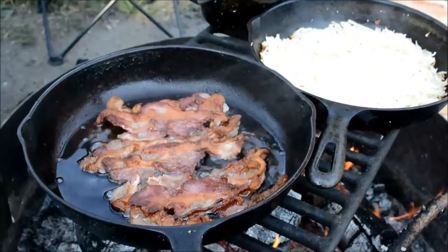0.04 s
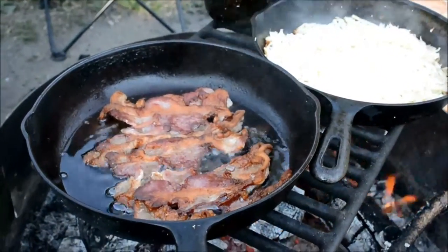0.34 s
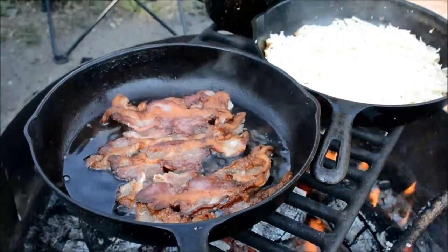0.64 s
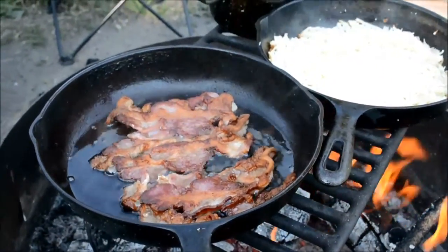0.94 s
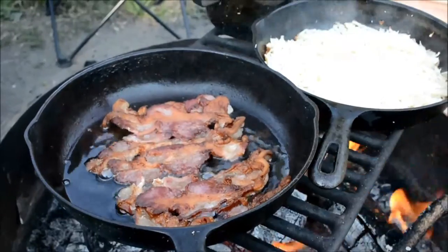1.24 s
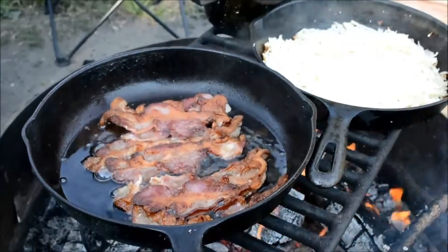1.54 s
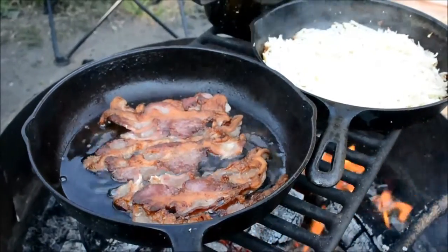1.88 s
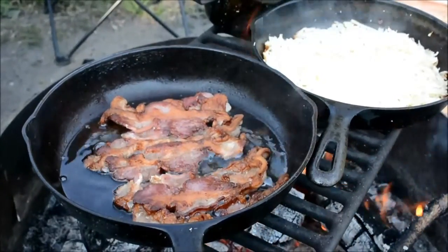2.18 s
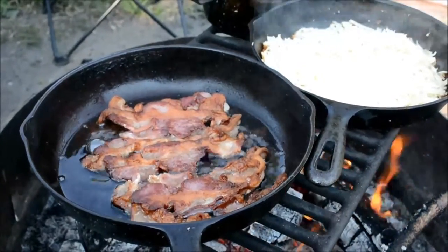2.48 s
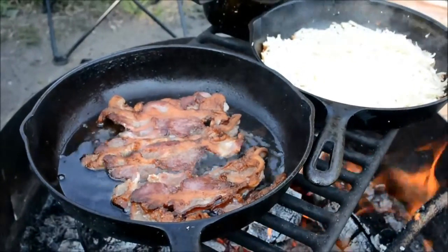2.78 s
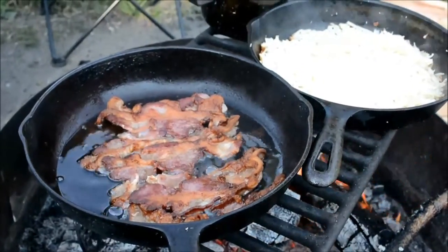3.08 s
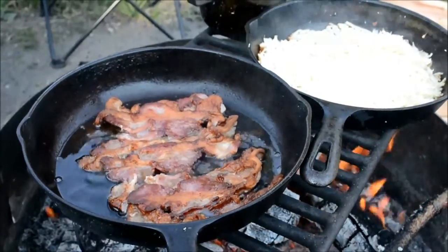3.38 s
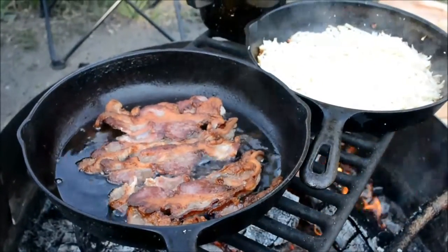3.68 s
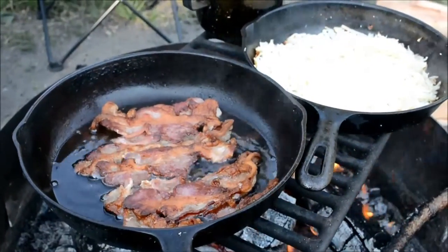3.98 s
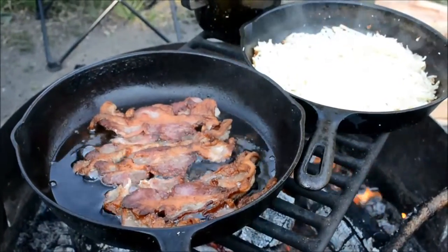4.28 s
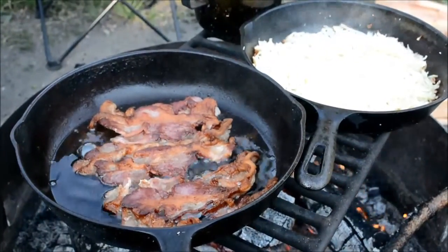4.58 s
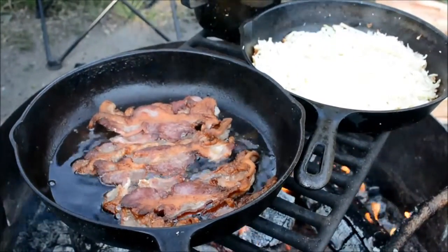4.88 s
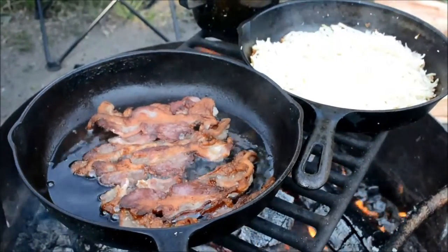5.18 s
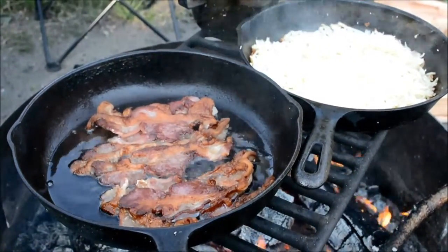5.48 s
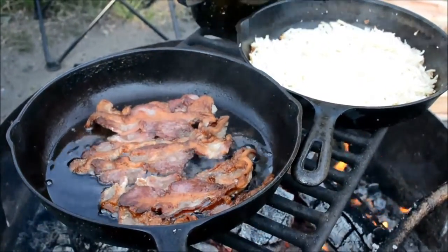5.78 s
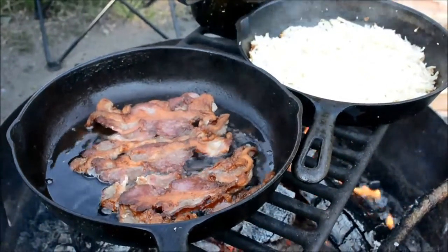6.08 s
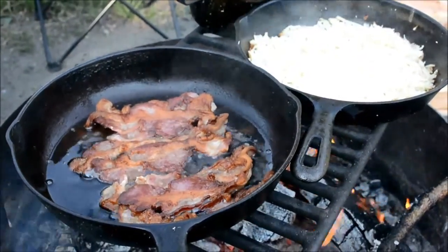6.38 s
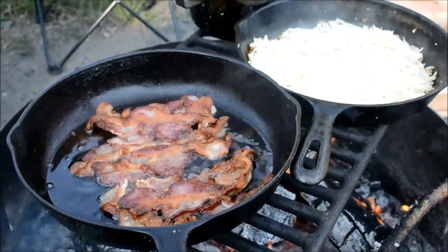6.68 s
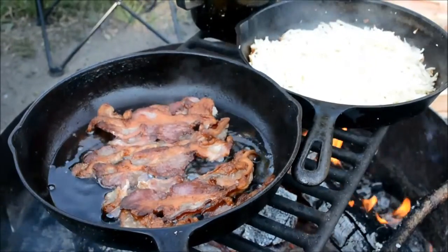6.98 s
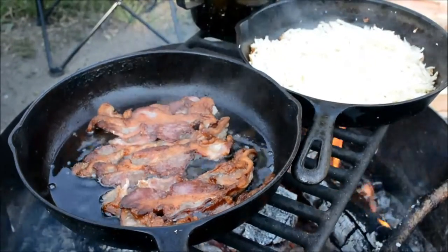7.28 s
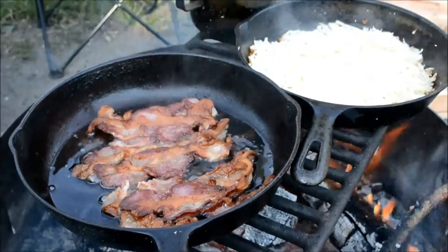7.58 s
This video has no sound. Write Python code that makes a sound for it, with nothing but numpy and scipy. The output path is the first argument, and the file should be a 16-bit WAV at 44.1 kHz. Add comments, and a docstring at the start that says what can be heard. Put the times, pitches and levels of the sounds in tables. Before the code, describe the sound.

Close to a pan on an outdoor wood fire, bacon grease fizzes brightly and pops at irregular moments. The flames make a soft rushing noise underneath, and the burning wood gives a few faint knocks early on. Crackles continue throughout, each leaving a very slight ring in the iron. Later one loud spit bursts from the pan with a brief spray, and the frying grows quieter toward the end.

```python
"""Outdoors at a campfire, bacon fries in a cast-iron skillet, heard from close by.
Countless small steam bubbles burst in the grease over the soft rush of the fire; larger ones plip
or squeak. Fat and embers snap, the wood knocks, and a trapped drop of water makes the pan spit hard
once. The iron rings faintly with each burst. Sizzle and fire fade toward the end."""
import sys
import numpy as np
from scipy import signal
from scipy.io import wavfile

SR = 44100
rng = np.random.default_rng(int(sys.argv[2]) if len(sys.argv) > 2 else 0)


def store_pcm(level_fs):
    """Save levels as 16-bit WAV."""
    pcm = np.round(np.clip(level_fs, -1, 1) * 32767).astype(np.int16)
    wavfile.write(sys.argv[1], SR, np.atleast_2d(pcm).T)


N = 337365
TIME_S = np.arange(N) / SR

# Sizzle bubble size by pitch: pitch_hz, level_db
SIZZLE_SPECTRUM = [(900, -7.5), (1400, -1.5), (2200, 1), (3100, -1), (4350, 1), (5700, -4.5), (7400, 0.5),
                   (9500, -4), (11500, -13)]
def sizzle(level_db=-39.9):
    """Water boils out of the bacon in a steady fizz."""
    pitches_hz = np.geomspace(1000, 11000, 96)
    sizes_db = spectrum_at(SIZZLE_SPECTRUM, pitches_hz)
    fizz = swarm(pitches_hz, sizes_db, per_s=9000, spread_db=4.5, cycles=1.28, clump_db=2.8, cap=3.7)
    return gain(level_db) * fizz


def swarm(pitches_hz, sizes_db, per_s, spread_db, cycles, clump_db, cap, site_count=8000):
    """Tiny bubbles burst in random clumps, up to cap * spread_db above their base size; unit rms."""
    burst_chance = gain(clump_db * drift(45)) * per_s * N / SR / len(pitches_hz) / site_count
    indices, left, right = [], [], []
    for hz, db in zip(pitches_hz, sizes_db):
        sites = rng.random((site_count, 5))
        bursts = sites[:, 1] < burst_chance[(sites[:, 0] * N).astype(int)]
        when, _, size, pan, sign = sites[bursts].T
        height = gain(db + spread_db * np.minimum(-np.log(1 - size), cap)) * np.sign(sign - .5)
        grain = cavity(hz, cycles * 2 ** rng.uniform(-0.41, 0.71) / hz)
        grain = grain / np.linalg.norm(grain)
        lean = (0.29 + hz / 22000) * (pan - .5)  # treble spreads wider
        indices.append(((when * N).astype(int)[:, None] + np.arange(len(grain))).ravel())
        left.append(np.outer(height * (1 + lean), grain).ravel())
        right.append(np.outer(height * (1 - lean), grain).ravel())
    channels = [np.bincount(np.concatenate(indices), np.concatenate(side), N) for side in (left, right)]
    return unit_rms(np.array(channels)[:, :N])


def cavity(hz, ring_s, end_hz=None, glide_s=1):
    """A bubble cavity rings up quickly and dies away; its pitch may slide as it opens."""
    t = np.arange(int(9 * ring_s * SR) + 8) / SR
    pitch_hz = np.full_like(t, hz) if end_hz is None else end_hz + (hz - end_hz) * np.exp(-t / glide_s)
    envelope = (t / ring_s * np.exp(1 - t / ring_s)) ** .75
    return envelope * np.sin(2 * np.pi * np.cumsum(pitch_hz) / SR)


# Large bubbles in the grease: start_s, level_db, pitch_hz, ring_cycles
LARGE_BUBBLES = [(0.012, -19.5, 1760, 0.75), (0.048, -21, 1300, 0.42), (.0485, -19, 3700, .5),
                 (.1455, -20, 8200, .9), (.148, -24, 3400, .8), (0.1532, -22, 1600, 1.1),
                 (.165, -22, 1800, .8), (.1747, -18, 2400, .3), (0.177, -17, 1920, 0.33),
                 (.237, -26, 7300, 1.4), (0.268, -23, 3480, 1.5), (.2675, -25, 5140, 1.6),
                 (.3765, -16, 6900, 1.3), (0.379, -18.5, 1420, 0.7), (0.42, -21, 2540, 0.51),
                 (.421, -19, 6430, 1), (0.528, -17, 3300, 0.51), (0.58, -19, 7150, 2.4),
                 (.587, -22, 3470, 0.79), (.637, -23, 7540, 1.6), (.6444, -24, 1550, 0.62),
                 (0.652, -25, 4130, 2.1), (.678, -24, 3810, .9), (.7807, -25, 2850, 1.1),
                 (0.797, -11.5, 2700, 0.29), (.7987, -24, 3330, 1.1), (0.802, -16, 7560, 0.62),
                 (0.8488, -17.5, 2900, 0.6), (0.894, -22, 7780, 1.3), (0.954, -20.5, 1790, 0.6),
                 (1.004, -26, 4230, 0.82), (1.024, -25, 1400, 1), (1.161, -27, 3090, 1.7),
                 (1.2285, -14.5, 3850, 1.2), (1.287, -18, 7500, .72), (1.3, -19, 2390, 0.71),
                 (1.359, -23, 6050, 1.3), (1.403, -13, 3420, 0.56), (1.457, -23, 6740, 1.5),
                 (1.48, -24, 1560, 0.63), (1.4864, -24, 1490, 0.61), (1.539, -23, 5800, 1.1),
                 (1.5445, -13.5, 2100, 0.36), (1.593, -17, 4320, 0.31), (1.6215, -18, 3100, 0.29),
                 (1.6274, -23, 1670, 0.64), (1.789, -26, 3550, 1.2), (1.7995, -25, 7300, 1.7),
                 (1.814, -25, 3900, 1.2), (1.864, -24, 7230, 1.9), (1.893, -21.5, 4230, 2.7),
                 (1.9163, -21, 1750, 0.6), (1.986, -24, 4260, 1.5), (2.018, -13.5, 5560, 0.32),
                 (2.026, -19, 4490, 1.3), (2.037, -25, 6930, 1.6), (2.123, -12, 2200, 0.51),
                 (2.242, -23, 8040, 0.9), (2.377, -14, 1500, 0.31), (2.476, -23, 7630, 1.2),
                 (2.48, -22.5, 4090, 0.91), (2.615, -21, 5260, 1.2), (2.63, -19, 1450, 0.45),
                 (2.748, -18, 3460, .48), (2.814, -12, 2400, 0.24), (2.7706, -24, 4260, 1),
                 (2.8197, -23, 4040, 1), (2.858, -21, 7350, .97), (2.888, -22, 4570, 1.3),
                 (2.897, -19.5, 4710, 1.3), (2.974, -20, 3730, 1), (2.982, -16, 2700, .75),
                 (3.023, -24, 4230, 1.1), (3.036, -25, 4030, 1), (3.117, -23.5, 4140, 0.9),
                 (3.131, -27, 1630, 1.5), (3.237, -18, 2090, 0.38), (3.2385, -24, 3200, 1.1),
                 (3.342, -21.5, 4450, 1.8), (3.3645, -19, 4020, 2.2), (3.5536, -24, 2510, .6),
                 (3.5658, -24, 4220, 1), (3.671, -18.5, 1870, 1), (3.674, -26, 6900, 1.6),
                 (3.71, -21.5, 3480, 0.74), (3.808, -14, 5260, 0.27), (3.8977, -21, 8200, 1.2),
                 (3.945, -19, 3380, 0.61), (3.988, -15.5, 3100, 0.49), (4.063, -24, 7000, .8),
                 (4.071, -20, 3880, .5), (4.104, -19, 3180, 0.74), (4.112, -10.5, 2480, 0.26),
                 (4.1286, -24, 2510, .7), (4.141, -25, 3670, 0.97), (4.163, -25, 1370, 1.6),
                 (4.171, -19, 7060, 1.6), (4.187, -18.5, 2400, 0.26), (4.217, -28, 1420, 1.4),
                 (4.308, -24, 3570, 3), (4.335, -21, 1750, 0.43), (4.3353, -17.5, 4100, 0.75),
                 (4.3682, -22, 3500, .55), (4.449, -20.5, 1320, 0.87), (4.4725, -25, 4360, 1),
                 (4.586, -26, 3980, 1.3), (4.597, -21, 2060, 0.76), (4.737, -22, 4830, 1.2),
                 (4.775, -16.5, 1700, .36), (4.934, -17, 8400, 1.7), (4.985, -17, 4950, .73),
                 (4.9936, -22, 2460, .8), (5.0067, -21, 7970, .7), (5.017, -14.5, 4450, 1.25),
                 (5.035, -25, 3960, 1), (5.0375, -21, 2100, .5), (5.123, -13.5, 2300, 0.17),
                 (5.157, -22, 3070, 0.91), (5.165, -24, 7700, 1.5), (5.233, -15.5, 2440, 0.24),
                 (5.2865, -22, 2570, .7), (5.326, -20, 3560, .67), (5.367, -20, 4030, 2),
                 (5.4, -24, 2610, .6), (5.4265, -28, 7520, 1.3), (5.614, -13, 3280, 0.52),
                 (5.663, -24, 4060, 1), (5.7273, -19.5, 1890, 0.43), (5.8995, -26, 7060, 1.3),
                 (5.922, -17, 3600, .4), (6.0225, -26, 4280, 1), (6.1176, -25, 7490, 1.3),
                 (6.217, -20.5, 3950, 0.62), (6.262, -23, 7430, 1.2), (6.324, -13, 2280, 0.2),
                 (6.396, -20, 1720, 0.25), (6.428, -25.5, 2250, 1.4), (6.4295, -29, 2850, 1.6),
                 (6.438, -30, 1370, 1), (6.519, -17, 3090, 0.29), (6.5428, -27, 4430, 1),
                 (6.5767, -23.5, 4410, 1.2), (6.604, -25, 8600, 1.1), (6.6575, -33, 2570, 0.6),
                 (6.6747, -28, 7400, 1.2), (6.725, -24, 7400, 1.4), (6.787, -21, 7600, 0.95),
                 (6.855, -27, 6950, 2.4), (7.034, -24.5, 4300, 1.3), (7.0623, -28, 2200, .5),
                 (7.272, -23.5, 2600, 0.71), (7.348, -29, 7000, 1), (7.514, -30, 7700, 1.9),
                 (7.5206, -37, 7850, 1.6), (7.528, -29.5, 7660, 1.5), (7.54, -28.5, 7150, 1.4),
                 (7.5683, -32, 2750, .6)]
def plips(table, trim_db=0, highpass_hz=607, film_db=-11, film_cycles=0.29, echo_db=-13, echo_s=.0016):
    """The film clicks, the cavity rings; the delay of the pan-wall echo depends on position."""
    out = np.zeros((2, N))
    for (start_s, db, hz, cycles), (side, position) in zip(table, rng.standard_normal((len(table), 2))):
        pan = 0.05 * side
        film = gain(db + trim_db + film_db) * min(cycles, 1) * cavity(hz, film_cycles / hz)
        burst = gain(db + trim_db) * cavity(hz, cycles / hz)
        place(out, start_s, film, pan)
        place(out, start_s, burst, pan)
        place(out, start_s + echo_s * (1 + np.tanh(position) / 2), gain(echo_db) * burst, -pan)
    out = butter(out, highpass_hz, "high")
    return butter(out, 9800, "low", order=6)  # grease rounds off the onset


# Mid-size bubble classes: rate_per_s, level_db, pitch_hz, ring_cycles
BUBBLE_CLASSES = [(5, -29.5, 1450, .9), (7, -29, 2550, .8), (10, -29, 4150, 1.15), (14, -31, 5700, 1.2),
                  (16, -28, 7800, 1.4)]
def stray_bubbles(spread_db=2.0, spread_octaves=0.13, ring_spread=0.29):
    """Rows for plips: bubbles burst at random; the longer one rings, the lower its peak."""
    rows = []
    for per_s, db, hz, cycles in BUBBLE_CLASSES:
        for start_s, (size, pitch, ring) in zip(random_times(per_s), rng.standard_normal((400, 3))):
            stretch = np.exp(ring_spread * ring)
            level_db = db + spread_db * size - 10 * np.log10(stretch)
            rows.append((start_s, level_db, hz * 2 ** (spread_octaves * pitch), cycles * stretch))
    return rows


# Runs of small pops: start_s, length_s, level_db, pitch_hz
POP_FLURRIES = [(0.024, .05, -27, 6300), (1.525, .16, -28.5, 6400), (1.766, .115, -28, 4730),
                (3.686, .11, -29, 5750)]
def flurries(per_s=140, spread_db=1.5, spread_octaves=0.3, cycles=1.07):
    """Rows for plips: water runs into hot fat and pops in quick succession."""
    rows = []
    for start_s, length_s, db, hz in POP_FLURRIES:
        for delay_s, (size, pitch) in zip(random_times(per_s), rng.standard_normal((400, 2))):
            if delay_s < length_s:
                pitch_hz = hz * 2 ** (spread_octaves * pitch)
                rows.append((start_s + delay_s, db + spread_db * size, pitch_hz, cycles))
    return rows


# Cracks of the hard spit: peak_s, level_db
SPIT_CRACKS = [(5.4415, -7), (5.4464, -2.5), (5.447, -3.5), (5.4475, -7), (5.4483, -5), (5.4491, -2.5),
               (5.4504, -10)]
def hard_spit(needle_s=.000034, suction_s=0.00013, lowpass_hz=11000):
    """A trapped water drop bursts in a volley of pressure needles, each flanked by shallow suction."""
    out, t = np.zeros((2, N)), np.arange(-32, 33) / SR
    needle, suction = np.exp(-(t / needle_s) ** 2), np.exp(-(t / suction_s) ** 2)
    pulse = butter(needle / needle.sum() - suction / suction.sum(), lowpass_hz, "low", order=8)
    for peak_s, db in SPIT_CRACKS:
        place(out, peak_s + t[0], gain(db) * pulse / pulse.max(), rng.uniform(-.1, .1))
    return out


# Loud snaps: start_s, level_db, lowpass_hz
LOUD_SNAPS = [(0.4514, -25, 13000), (.8492, -17, 4000), (1.0121, -20, 9000), (1.1125, -17.5, 11300),
              (1.745, -18, 7000), (1.84, -14, 10500), (2.1228, -21, 5000), (2.3828, -21, 7000),
              (2.8142, -23, 11000), (3.0977, -17, 12000), (3.6005, -22, 10000), (4.1118, -24, 15000),
              (4.3743, -24, 13000), (5.123, -15.5, 9000), (5.4305, -20, 9000), (5.466, -15, 5000),
              (5.469, -23, 8000), (5.4743, -25, 9000), (5.8436, -19.5, 9000), (5.917, -20, 10000),
              (5.9402, -21, 6000), (6.3198, -25, 9000), (6.5764, -19, 11500), (6.5781, -23, 7000),
              (6.5815, -21, 15000), (6.7158, -22, 9000), (6.9995, -27, 11000), (7.0933, -20, 13500),
              (7.1148, -28, 11000), (7.5677, -27.5, 11000), (7.6243, -27, 12900)]
def snaps(table, trim_db=1, splinter=0.27, decay_s=0.0013, highpass_hz=1400):
    """Fat or an ember snaps: one steep crack, then a millisecond of splintering."""
    out, t = np.zeros((2, N)), np.arange(SR // 100) / SR
    for start_s, db, lowpass_hz in table:
        crack = (t == 0) + splinter * rng.standard_normal(len(t)) * np.exp(-t / decay_s)
        crack = butter(butter(crack, lowpass_hz, "low", order=1), highpass_hz, "high")
        top_octave = 0.4 * (lowpass_hz / 13000) ** 3 * np.diff(crack, prepend=0)
        snap = butter(crack, 10400, "low", order=8) + butter(top_octave, 14800, "low", order=4)
        place(out, start_s, gain(db + trim_db) * snap / abs(snap).max(), rng.uniform(-0.14, 0.15))
    return out


def stray_snaps(per_s=3, level_db=-28, lowpass_hz=11000, spread_db=1.5, spread_octaves=0.18):
    """Rows for snaps: faint ones at random times."""
    return [(start_s, level_db + spread_db * size, lowpass_hz * 2 ** (spread_octaves * edge))
            for start_s, (size, edge) in zip(random_times(per_s), rng.standard_normal((200, 2)))]


# Steam escaping under the bacon: start_s, level_db, start_hz, end_hz, glide_s, ring_s
STEAM_SQUEAKS = [(.069, -26, 12200, 9900, 0.00163, 0.0016), (1.821, -17.5, 4780, 3900, 0.0047, 0.0013),
                 (1.8235, -27, 3900, 2860, .005, .0016), (5.8432, -14.5, 3250, 2150, 0.001, 0.00041),
                 (5.846, -23, 2370, 1990, 0.0087, 0.0043)]
def squeaks():
    """A steam pocket widens as it vents, so its note falls."""
    out = np.zeros((2, N))
    for start_s, db, start_hz, end_hz, glide_s, ring_s in STEAM_SQUEAKS:
        place(out, start_s, gain(db) * cavity(start_hz, ring_s, end_hz, glide_s), pan=0)
    return out


# Boiling surges: crest_s, level_db
BOIL_SURGES = [(.015, -30), (.055, -33), (.115, -32), (.163, -28), (0.246, -29.5), (0.374, -29.5),
               (.432, -32)]
def boil(rise_s=0.032, fall_s=0.04, centre_hz=1700, rolloff_db=-5.8):
    """Grease boils up in surges of lower bubbles, so crowded that they merge into a rush."""
    pitches_hz = np.geomspace(640, 7500, 30)
    sizes_db = rolloff_db * np.log2(pitches_hz / centre_hz) ** 2
    surges = [gain(db) * swell(crest_s, rise_s, 0, fall_s) for crest_s, db in BOIL_SURGES]
    bubbles = swarm(pitches_hz, sizes_db, per_s=2400, spread_db=2.7, cycles=1.1, clump_db=2, cap=2.9)
    return np.linalg.norm(surges, axis=0) * bubbles


# Grease jets: start_s, level_db, length_s
GREASE_JETS = [(5.4395, -26, .003), (5.4462, -17.5, 0.003), (5.458, -34, 0.011), (5.848, -34, 0.016)]
def spray(rise_s=0.00044, fall_s=0.0034, db_per_octave=1.5):
    """Dense jets of droplets fly out of the pan."""
    pitches_hz = np.geomspace(1100, 11000, 20)
    sizes_db = db_per_octave * np.log2(pitches_hz / 4000)
    drops = swarm(pitches_hz, sizes_db, per_s=12000, spread_db=1, cycles=1.5, clump_db=0, cap=3)
    return drops * sum(gain(db) * swell(start_s, rise_s, length_s, fall_s)
                       for start_s, db, length_s in GREASE_JETS)


# Droplet landings: start_s, level_db
MIST_LANDINGS = [(1.545, -47), (1.62, -46), (5.445, -35), (5.914, -41)]
def mist(rise_s=0.00044, fall_s=0.059, db_per_octave=7.0):
    """Droplets thrown by a spit land on hot iron and fizz briefly."""
    pitches_hz = np.geomspace(4000, 11000, 8)
    sizes_db = db_per_octave * np.log2(pitches_hz / 4000)
    drops = swarm(pitches_hz, sizes_db, per_s=3300, spread_db=4, cycles=1.1, clump_db=4.5, cap=3.4)
    return drops * sum(gain(db) * swell(start_s, rise_s, 0, fall_s) for start_s, db in MIST_LANDINGS)


# Skillet modes: pitch_hz, gain_db, t60_s
IRON_MODES = [(1353, -10, 0.074), (4310, -2, 0.17), (4560, -6, 0.22)]
def skillet(bursts):
    """Every burst makes the pan ring a little; the grease damps it."""
    t = np.arange(SR // 3) / SR
    modes = np.zeros_like(t)
    for hz, db, t60_s in IRON_MODES:
        decay = gain(-60 * t / t60_s)
        modes += gain(db) * 2 * decay / decay.sum() * np.sin(2 * np.pi * hz * t)
    return bursts + signal.oaconvolve(bursts, modes[None], axes=1)[:, :N]


# Rush spectrum: frequency_hz, density_db
RUSH_SPECTRUM = [(25, -55), (60, -30.5), (130, -13), (245, -2), (320, -8.5), (420, -11), (520, -2),
                 (1000, -1.5), (1350, .8), (2100, -5.5), (3200, -12.5), (4400, -12), (5900, -18),
                 (8000, -14.5), (11000, -17.5), (13000, -25.5), (16000, -41)]
# Rush stereo width: frequency_hz, side_to_mid_db
RUSH_WIDTH = [(70, -31), (300, -20), (700, -18), (1400, -30), (4000, -18), (9000, -9), (13000, -27)]
def fire_rush(level_db=-38.0, patch_db=0.9):
    """Flames and the blur of far bubbles: soft noise with drifting patches."""
    hz = np.fft.rfftfreq(1024, 1 / SR)
    mid_re, mid_im, side_re, side_im, patches = rng.standard_normal((5, N // 256 + 5, len(hz)))
    patches = unit_rms(signal.fftconvolve(patches, np.ones((8, 14)), "same"))
    mid = mid_re + 1j * mid_im
    side = gain(spectrum_at(RUSH_WIDTH, hz)) * (side_re + 1j * side_im)
    colour = gain(spectrum_at(RUSH_SPECTRUM, hz) + patch_db * patches)
    frames = np.array([mid + side, mid - side]) * colour
    _, noise = signal.istft(frames.swapaxes(1, 2), nperseg=1024, noverlap=768)
    return gain(level_db) * unit_rms(noise[:, :N])


# Wood knocks: start_s, level_db, pitch_hz, ring_cycles
WOOD_KNOCKS = [(.848, -36, 352, 0.85), (.925, -41, 256, 1.3), (1.808, -25, 844, 0.56),
               (1.838, -28, 342, 0.38)]
def wood_knocks():
    """Burning wood knocks: a click and a short ring, like a low plip."""
    return plips(WOOD_KNOCKS, trim_db=-2.0, highpass_hz=100)


def reflections(frying, wall_db=-18, wall_decay_s=0.0096, tail_db=-21, tail_decay_s=0.011):
    """The skillet wall echoes at once; grate and fire ring add a faint, short tail."""
    t = np.arange(SR // 8) / SR
    wall = rng.standard_normal(len(t)) * np.exp(-t / wall_decay_s) * (t > .0006)
    tail = rng.standard_normal((2, len(t))) * np.exp(-t / tail_decay_s) * (t > .003)
    echo = gain(wall_db) * wall / np.linalg.norm(wall) + gain(tail_db) * tail / np.linalg.norm(tail[0])
    return frying + signal.oaconvolve(frying, echo, axes=1)[:, :N]


def hiss(level_db=-68, highpass_hz=6000):
    """A faint steady hiss remains as the frying fades."""
    return gain(level_db) * butter(rng.standard_normal(N), highpass_hz, "high")


def fade(trim_db=1, start_s=5.503, length_s=2.58):
    """Steady gain, then a linear fall."""
    return gain(trim_db) * np.clip(1 - (TIME_S - start_s) / length_s, 0, 1)


def swell(crest_s, rise_s, hold_s, fall_s):
    """Exponential rise to the crest, hold, exponential fall."""
    before_s, after_s = np.maximum(crest_s - TIME_S, 0), np.maximum(TIME_S - crest_s - hold_s, 0)
    return np.exp(-before_s / rise_s - after_s / fall_s)


def drift(knots_per_s):
    """Random wander at unit rms."""
    knots = rng.standard_normal(4096)
    return unit_rms(np.interp(TIME_S * knots_per_s, np.arange(len(knots)), knots))


def random_times(per_s):
    """Up to 400 Poisson arrivals."""
    times_s = np.cumsum(rng.exponential(1, 400)) / per_s
    return times_s[times_s < N / SR]


def place(mix, start_s, sound, pan):
    """Adds a sound to the stereo mix; positive pan is left."""
    part = mix[:, max(round(start_s * SR), 0):][:, :len(sound)]
    part += np.outer([1 + pan, 1 - pan], sound[:part.shape[1]])


def spectrum_at(table, hz):
    """Interpolates over log frequency."""
    points_hz, points_db = np.transpose(table)
    return np.interp(np.log(hz + 1), np.log(points_hz), points_db)


def butter(x, hz, kind, order=2):
    return signal.sosfilt(signal.butter(order, min(hz, .49 * SR), kind, fs=SR, output="sos"), x)


def gain(db):
    return 10 ** (np.asarray(db) / 20)


def unit_rms(x):
    return x / np.sqrt(np.mean(x ** 2) + 1e-20)


def scene():
    """A fading bed of frying and fire, with single bursts on top."""
    fading = fade()
    fizz = butter(fading * sizzle() + boil() + spray() + mist(), 570, "high")
    strays = fading * (plips(stray_bubbles() + flurries()) + snaps(stray_snaps()))
    bursts = plips(LARGE_BUBBLES, trim_db=0.5) + squeaks() + snaps(LOUD_SNAPS) + hard_spit()
    frying = skillet(fizz + strays + bursts)
    return fading * fire_rush() + hiss() + reflections(frying) + wood_knocks()


def record(dry, balance_db=0.33, lowpass_hz=15900):
    """Left channel slightly louder, then a steep low-pass."""
    balanced = dry * gain([[balance_db], [-balance_db]])
    lowpass = signal.firwin(511, lowpass_hz, window=("kaiser", 9), fs=SR)
    return signal.oaconvolve(balanced, lowpass[None], "same")


dry = scene()
out = record(dry)
store_pcm(out)
```